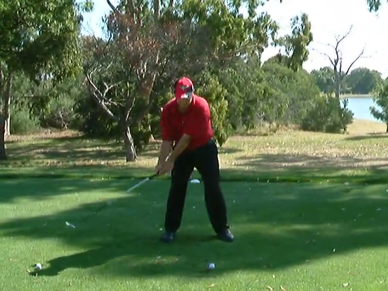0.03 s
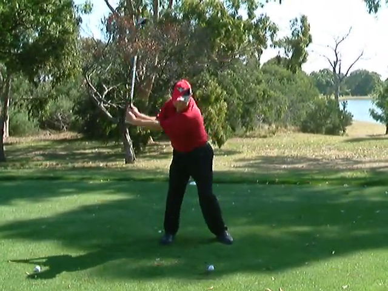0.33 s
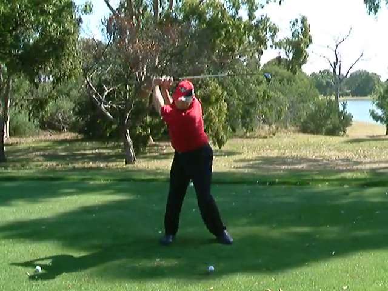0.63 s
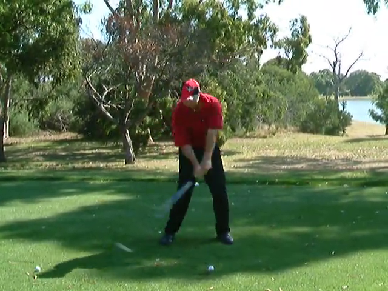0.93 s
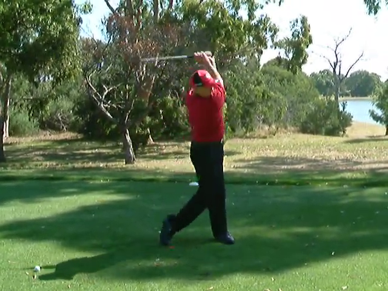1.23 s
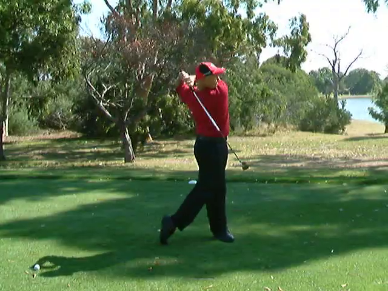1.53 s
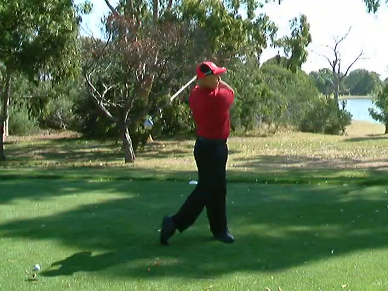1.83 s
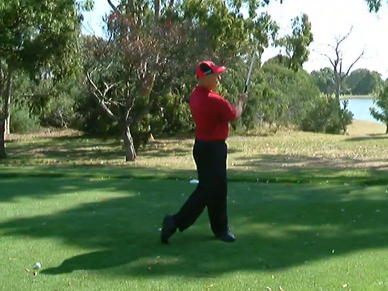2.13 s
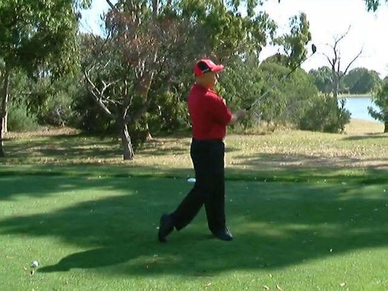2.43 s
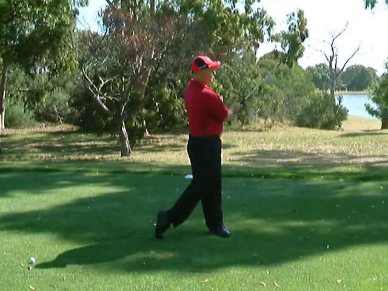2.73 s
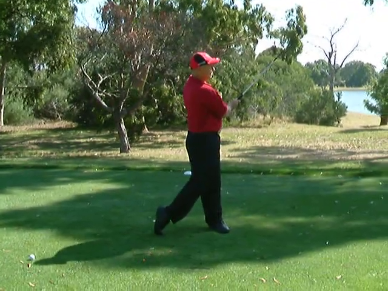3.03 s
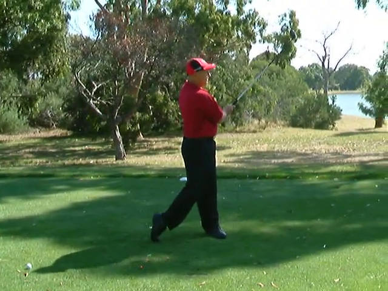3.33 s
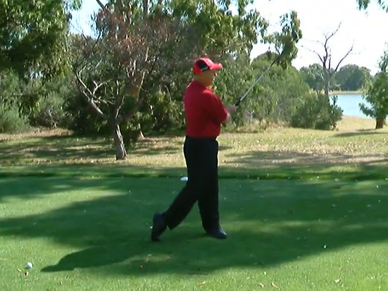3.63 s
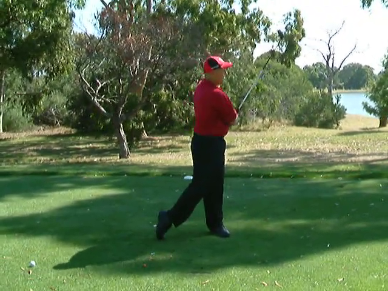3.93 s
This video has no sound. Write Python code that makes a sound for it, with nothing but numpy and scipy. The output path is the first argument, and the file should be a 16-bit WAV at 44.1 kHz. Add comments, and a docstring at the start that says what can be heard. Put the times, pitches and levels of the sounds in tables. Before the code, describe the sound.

A golf drive is the main sound: at about 1 second a quick whoosh ends in a sharp, ringing metallic crack, echoing off trees for half a second. Before it, a distant bird chirps faintly at 0.2 seconds. A faint far breeze swells around 3 seconds, and something small and hard ticks twice near 3.3 seconds. Light wind buffets the microphone throughout, over a soft steady hiss.

```python
"""A golf drive, heard from a tee ringed by trees. The shaft whooshes down, the hollow metal head cracks
and rings against the ball, and trunks and leaves scatter the crack back. Light wind buffets the
microphone throughout, over a steady hiss. A far bird chirps once before the swing; about two seconds
after the shot a distant rush swells and a small hard thing ticks twice."""
import sys
import numpy as np
from scipy import signal
from scipy.fft import rfft, irfft
from scipy.io import wavfile
from scipy.ndimage import uniform_filter1d

SR = 44100
rng = np.random.default_rng(int(sys.argv[2]) if len(sys.argv) > 2 else 0)


def transcribe(signal):
    """Save signal, clipped to [-1, 1], as a 16-bit WAV file at the path in sys.argv[1]."""
    frames = np.atleast_2d(signal).T
    limited = np.clip(frames, -1, 1)
    pcm = np.round(limited * 32767).astype(np.int16)
    wavfile.write(sys.argv[1], SR, pcm)


N = 176400


def from_db(db):
    """Decibels to gain."""
    return 10 ** (np.asarray(db) / 20)


def unit_rms(x):
    """Scale to an rms of 1."""
    return x / np.sqrt(np.mean(x ** 2) + 1e-20)


def clock():
    """Time of every sample in seconds."""
    return np.arange(N) / SR


def curve(rows, outside=None):
    """Join (seconds, value) rows by straight lines."""
    return np.interp(clock(), *np.transpose(rows), left=outside, right=outside)


def coloured(spectrum):
    """Noise of unit rms shaped by (Hz, relative dB) rows, empty below 15 Hz."""
    hz, db = np.transpose(spectrum)
    bin_hz = np.arange(N // 2 + 1) * SR / N
    gain = from_db(np.interp(np.log(bin_hz + 1e-9), np.log(hz), db)) * (bin_hz > 15)
    return unit_rms(irfft(rfft(rng.standard_normal(N)) * gain, N))


def drift(rate_hz):
    """Smooth random wander of unit rms."""
    pole = np.exp(-2 * np.pi * rate_hz / SR)
    wander = signal.lfilter([1], [1, -2 * pole, pole * pole], rng.standard_normal(N + SR))
    return unit_rms(wander[SR:])


def decay(start, t60):
    """Envelope that jumps to 1, then falls 60 dB every t60 seconds."""
    age = clock() - start
    return (age >= 0) * from_db(-60 * np.maximum(age, 0) / t60)


def swell(centre_s, half_s):
    """Bell-shaped envelope: 1 at the centre, 1/e at half_s to either side."""
    return np.exp(-((clock() - centre_s) / half_s) ** 2)


def click(at_s):
    """A unit impulse."""
    return 1.0 * (np.arange(N) == int(at_s * SR))


def ring(force, hz, t60):
    """One damped mode; a unit click rings with height 1."""
    radius = np.exp(-np.log(1000) / (t60 * SR))
    angle = 2 * np.pi * hz / SR
    return signal.lfilter([0, np.sin(angle)], [1, -2 * radius * np.cos(angle), radius ** 2], force + 1e-18)


def body(force, modes):
    """A struck object: modes in parallel, signs alternating."""
    return sum((-1) ** k * from_db(db) * ring(force, hz, t60) for k, (hz, db, t60) in enumerate(modes))


def eddies(spectrum):
    """Low turbulent noise, its level evened out over 50 ms."""
    noise = coloured(spectrum)
    return noise / np.sqrt(uniform_filter1d(noise ** 2, size=2200) + 1e-9)


# Light wind on the microphone. Each row: time in seconds, large-eddy level in dB.
WIND_LEVEL = [(0, -46), (.5, -42.5), (.72, -48), (1.0, -44), (1.2, -40), (1.45, -39.5), (1.65, -45.5),
              (1.8, -41), (1.95, -48), (2.15, -45), (2.3, -41), (2.55, -43), (2.75, -46.5), (3.0, -40),
              (3.2, -42), (3.36, -50.5), (3.48, -38.5), (3.7, -42), (4, -46.5)]
# Single buffets. Each row: centre in seconds, large-eddy level in dB, small-eddy level in dB,
# half length in seconds.
BUFFETS = [(0.121, -41, -40, 0.02), (0.297, -43, -49, 0.017), (0.509, -44, -43.5, 0.013),
           (0.83, -39, -42, 0.023), (0.886, -35, -40, .015), (1.038, -52, -34.5, 0.016),
           (1.202, -45, -39, .06), (1.312, -32, -36, 0.013), (1.362, -30.5, -31, 0.019),
           (1.421, -35.5, -34, 0.019), (1.484, -32.5, -38, 0.01), (2.351, -43.5, -42.5, 0.013),
           (2.582, -35, -49, 0.015), (2.895, -31, -38, 0.014), (2.925, -42, -37, .011),
           (3.156, -41, -43, 0.014), (3.512, -36.5, -40, 0.016), (3.559, -42, -36.5, 0.0092),
           (3.815, -28, -31, 0.019)]
# Large eddies rumble, small ones flutter. Each row: frequency in Hz, relative level in dB.
RUMBLE_SPECTRUM = [(20, -11.5), (35, -5), (60, 0.5), (100, 0.5), (150, -6), (220, -22.5), (400, -44),
                   (2000, -89)]
FLUTTER_SPECTRUM = [(90, -17), (150, -0.5), (195, -0.5), (260, -9), (340, -15.5), (480, -30), (2000, -74)]
def wind(flutter_db=-8.3):
    """Large and small eddies right on the microphone swell in short buffets."""
    large_power = from_db(curve(WIND_LEVEL)) ** 2
    small_power = large_power * from_db(flutter_db) ** 2
    for centre_s, large_db, small_db, half_s in BUFFETS:
        gust = swell(centre_s, half_s)
        large_power += from_db(large_db) ** 2 * gust
        small_power += from_db(small_db) ** 2 * gust
    rumble = np.sqrt(large_power) * eddies(RUMBLE_SPECTRUM)
    flutter = np.sqrt(small_power) * eddies(FLUTTER_SPECTRUM)
    return rumble + flutter


# Hiss around the tee and a breeze farther off. Each row: frequency in Hz, relative level in dB.
HISS_SPECTRUM = [(100, 0), (300, 2), (450, 2.5), (700, 6), (1050, 7), (1500, 2), (2200, -2.5), (4000, -4),
                 (6000, -4), (7400, -5), (8100, -8.5), (8700, -7), (10000, -52.5)]
BREEZE_SPECTRUM = [(400, -18), (750, 1.5), (1050, 4), (1500, -19), (3000, -23)]
# The swell of that breeze. Each row: time in seconds, level in dB.
BREEZE_LEVEL = [(2.5, -73), (2.82, -53), (3.2, -52), (3.38, -62), (3.8, -65)]
def air(hiss_db=-50):
    """Open air: a steady hiss, and a distant rush that swells and fades."""
    hiss = from_db(hiss_db) * coloured(HISS_SPECTRUM)
    breeze = from_db(curve(BREEZE_LEVEL)) * coloured(BREEZE_SPECTRUM)
    return hiss + breeze


def bird(centre_s=.235, length_s=.105, top_hz=3920, arch_hz=260, level_db=-56):
    """One faint whistle far from the microphone, arching in pitch and level."""
    along = np.clip(2 * (clock() - centre_s) / length_s, -1, 1)
    hz = top_hz - arch_hz * along ** 2
    return from_db(level_db) * (1 - along ** 2) * np.sin(2 * np.pi * np.cumsum(hz) / SR)


# The club's tone, which follows the air speed past it. Each row: time in seconds, pitch in Hz.
SWING_PITCH = [(.94, 500.5), (.966, 598), (.982, 717), (1.01, 884), (1.024, 763), (1.034, 570), (1.06, 600)]
# Strength of that tone. Each row: time in seconds, level in dB.
SWING_LEVEL = [(.93, -70), (.96, -48), (.975, -38), (.983, -27.5), (.99, -43), (1.002, -42), (1.013, -29.5),
               (1.034, -32), (1.052, -39.5), (1.072, -62)]
# Turbulence as the head sweeps by. Each row: frequency in Hz, relative level in dB.
RUSH_SPECTRUM = [(120, 2.5), (310, 6), (420, -8), (1000, 0), (2200, -10), (4000, -17), (8000, -25)]
def whoosh(waver=.07, flutter_db=2.2, rush_db=-35):
    """Vortices shed by the club sing a wavering tone inside a rush of turbulence."""
    hz = curve(SWING_PITCH) * (1 + waver * drift(rate_hz=170))
    tone = np.sqrt(2) * np.sin(2 * np.pi * np.cumsum(hz) / SR)
    tone_db = curve(SWING_LEVEL, outside=-120) + flutter_db * drift(rate_hz=100)
    rush = from_db(rush_db) * swell(1.013, half_s=.029) * coloured(RUSH_SPECTRUM)
    return from_db(tone_db) * tone + rush


# Modes of the hollow metal head. Each row: frequency in Hz, level in dB, t60 in seconds.
HEAD_MODES = [(1250, -20, .02), (1430, -18, 0.028), (1700, -16, 0.022), (2010, -13, 0.028),
              (2170, -14.5, 0.021), (2630, -17, .008), (3390, -11.5, 0.02), (4800, -10.5, 0.016),
              (5284, -19, .031), (5473, -22, .068), (5575, -14, .041), (5745, -23, .045), (5872, -16, .049),
              (5960, -17.5, .044), (6200, -20, .022), (6420, -12.5, 0.025), (6750, -15, .023),
              (8000, -15, 0.008)]
# A crowd of short modes, with tee and turf. Each row: frequency in Hz, relative level in dB.
CRACK_SPECTRUM = [(150, -10), (400, -15), (650, -3), (950, -11), (1250, 0), (2000, 2), (2900, -0.5),
                  (4100, -13.5), (6200, 0), (8000, -4), (10000, -25)]
def strike(impact_s, contact_db=-1, crack_db=-15, turf_delay_s=.0058, turf_db=-9):
    """At the tee the ball flattens on the face in one short pulse; the head rings and cracks."""
    blow = click(impact_s)
    turf_echo = from_db(turf_db) * click(impact_s + turf_delay_s)
    contact = from_db(contact_db) * ring(blow + turf_echo, hz=1900, t60=.0026)
    crack = from_db(crack_db) * decay(impact_s, t60=.033) * coloured(CRACK_SPECTRUM)
    return body(blow, HEAD_MODES) + contact + crack


# Stands of trees around the tee, nearer one first. Each row: delay in seconds, level in dB,
# rise in seconds, t60 in seconds, treble loss in dB per octave.
TREE_STANDS = [(.054, -31, .03, .40, 0), (.19, -50, .04, .5, 2)]
# Slaps off farther trunks. Each row: delay in seconds, level in dB, half length in seconds.
SLAPS = [(.112, -49, .012), (.131, -41.5, .008), (.152, -48, .015), (.228, -53, .03)]
# The bright scatter and the duller slaps. Each row: frequency in Hz, relative level in dB.
SCATTER_SPECTRUM = [(300, -14), (600, -8), (1000, -13), (1700, -16), (2550, -14), (2900, -15.5),
                    (3350, -9.5), (4200, -15), (5000, -7.5), (5800, 3.5), (6800, -7.5), (7500, -16),
                    (8400, -10), (10000, -36)]
SLAP_SPECTRUM = [(700, -14), (1500, -5), (2100, -4), (2550, 1), (3000, -5), (4200, -10), (8000, -26)]
def tree_echoes(shot, impact_s, first_delay_s=.0517, first_db=-23.5, patchy_db=1.8):
    """One distinct echo, then the crack smeared to an uneven hiss by trunks and leaves, and dull slaps."""
    echoes = from_db(first_db) * np.interp(clock() - first_delay_s, clock(), shot, left=0)
    for delay_s, db, rise_s, t60, loss_db in TREE_STANDS:
        spectrum = [(hz, level - loss_db * np.log2(hz)) for hz, level in SCATTER_SPECTRUM]
        patches = from_db(db + patchy_db * drift(rate_hz=70))
        envelope = decay(impact_s + delay_s, t60) - decay(impact_s + delay_s, rise_s)
        echoes += patches * envelope * coloured(spectrum)
    slaps = sum(from_db(db) * swell(impact_s + delay_s, half_s) for delay_s, db, half_s in SLAPS)
    return echoes + slaps * coloured(SLAP_SPECTRUM)


# Two light knocks. Each row: start in seconds, strength of the push in dB, softness in seconds.
TICKS = [(3.2702, -29.5, 0.000026), (3.3103, -37, 0.00022)]
# Modes of the knocking object. Each row: frequency in Hz, gain in dB, t60 in seconds.
TICK_MODES = [(920, 1, .027), (1240, -8, .02), (1680, 2, 0.013), (2580, 1, 0.0054), (3900, 6.5, 0.0038),
              (6200, 1.5, 0.0037), (8100, -7, .003)]
# The scuff of the second touch. Each row: frequency in Hz, relative level in dB.
SCUFF_SPECTRUM = [(600, -15), (1150, 0), (1900, -2), (2800, -15), (8000, -24)]
def ticks(scuff_db=-41.5, low_cut_hz=650):
    """A small hard thing knocks, then touches again more softly and slides a little."""
    pushes = np.zeros(N)
    for start_s, db, softness_s in TICKS:
        pole = np.exp(-1 / (softness_s * SR))  # a softer touch spreads the push and dulls it
        pushes += from_db(db) * signal.lfilter([1 - pole], [1, -pole], click(start_s))
    low_cut = signal.butter(2, low_cut_hz, "high", fs=SR, output="sos")
    knocks = signal.sosfilt(low_cut, body(pushes, TICK_MODES))
    scuff = from_db(scuff_db) * swell(3.3115, half_s=.0035) * coloured(SCUFF_SPECTRUM)
    return knocks + scuff


def scene():
    """The shot and its echoes in the open air, at one microphone."""
    impact_s = 1.022
    shot = whoosh() + strike(impact_s)
    return (shot + tree_echoes(shot, impact_s) + ticks() + bird() + wind() + air())[None]


def record(dry):
    """The crack overloads slightly, the top is cut, and the signal rides on a constant offset."""
    ceiling, stopband_hz, offset = .7, 8982, -.0559
    rounded = ceiling * np.tanh(dry / ceiling)
    high_cut = signal.cheby2(12, 50, stopband_hz, fs=SR, output="sos")
    return signal.sosfilt(high_cut, rounded) + offset


dry = scene()
out = record(dry)
transcribe(out)
```